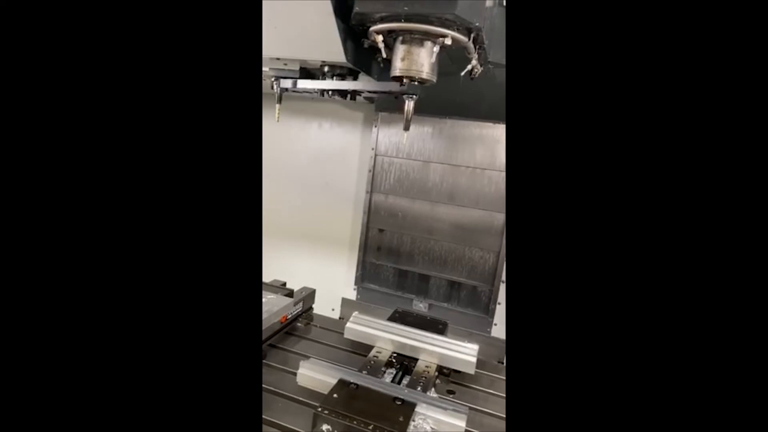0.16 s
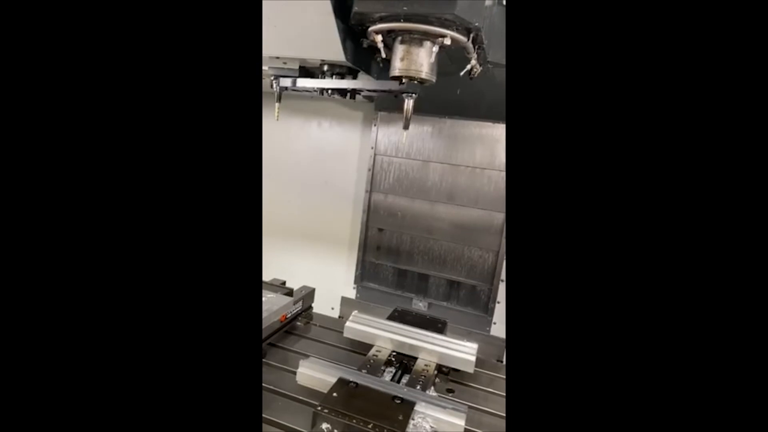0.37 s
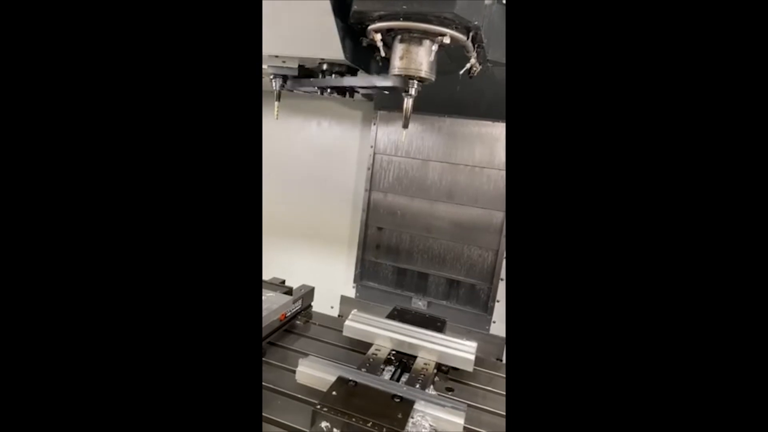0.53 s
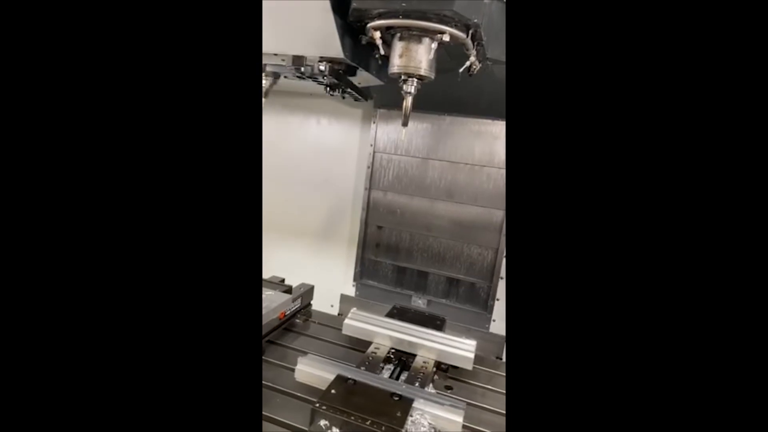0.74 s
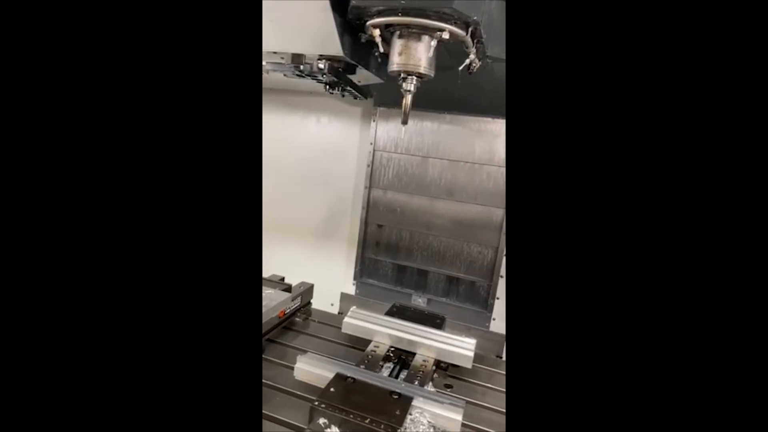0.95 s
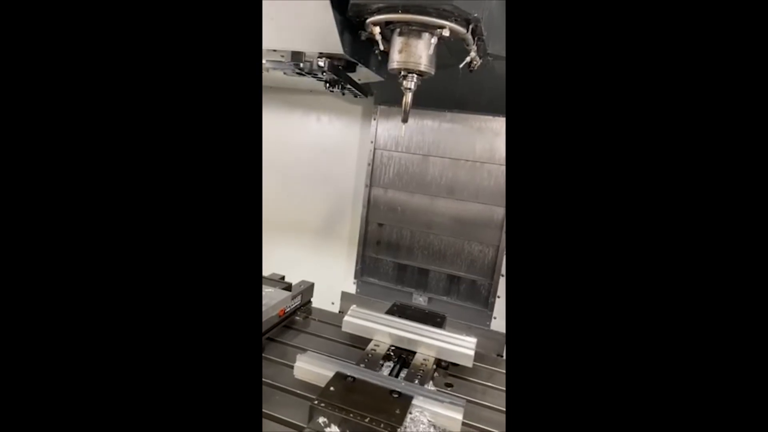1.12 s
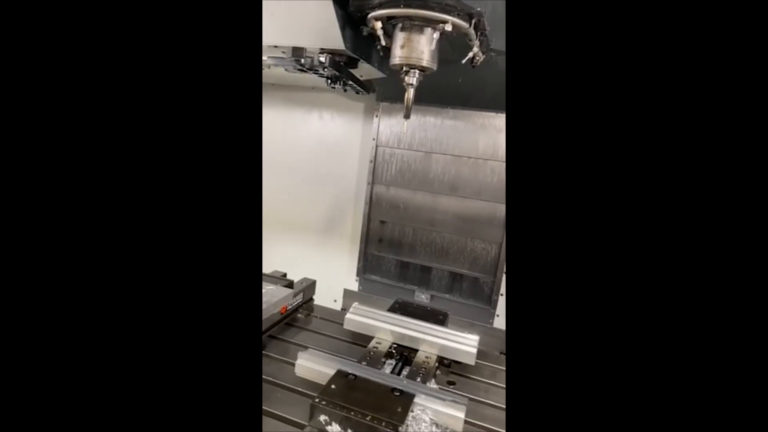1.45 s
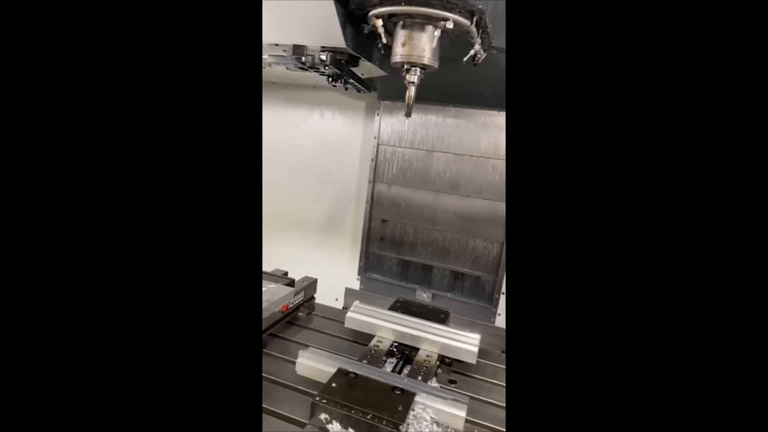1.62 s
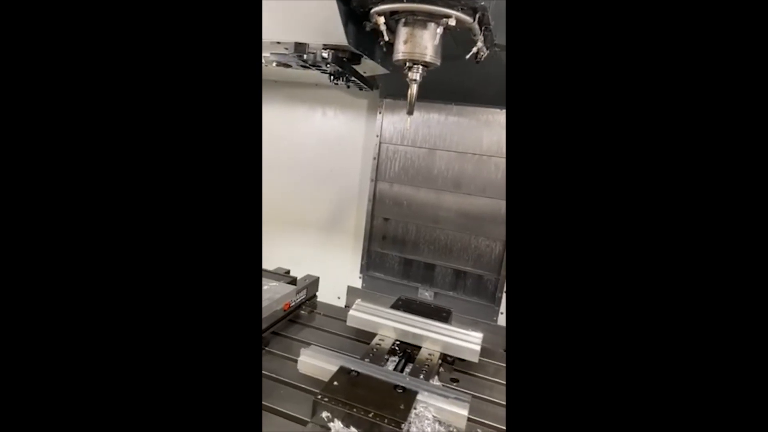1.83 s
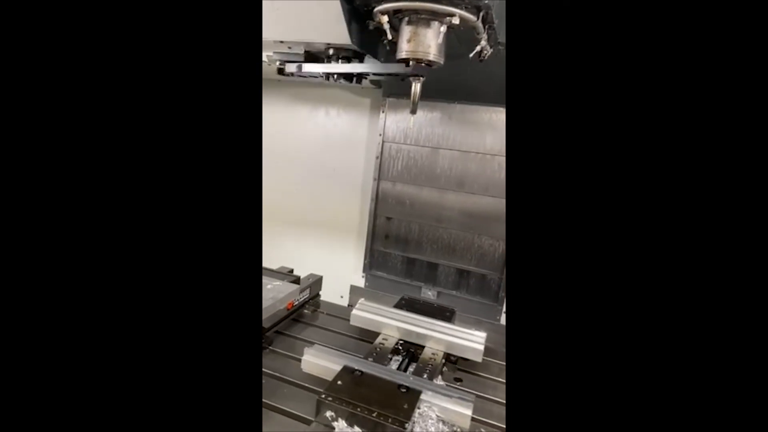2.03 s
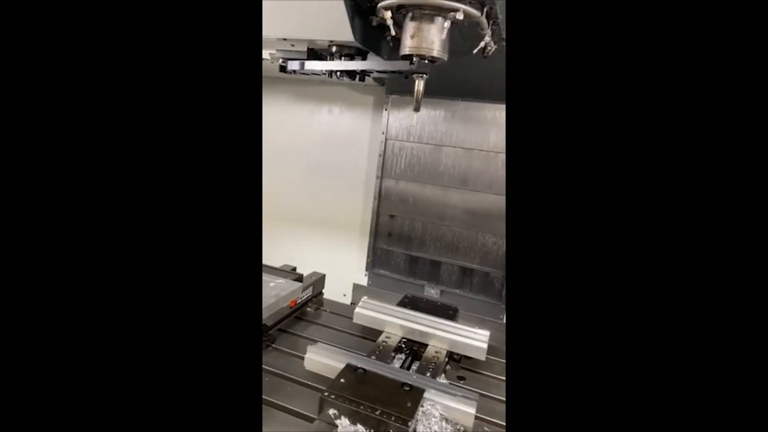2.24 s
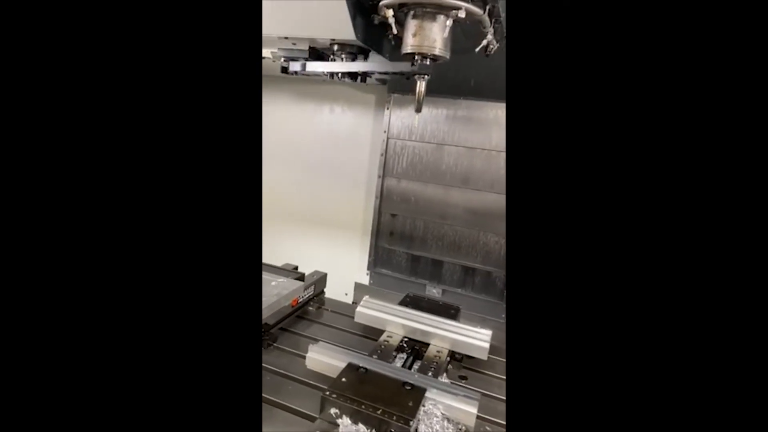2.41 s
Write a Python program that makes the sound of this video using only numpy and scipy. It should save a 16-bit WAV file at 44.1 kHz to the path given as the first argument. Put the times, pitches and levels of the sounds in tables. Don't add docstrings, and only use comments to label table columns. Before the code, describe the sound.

Inside a machining centre, a geared motor winds down, latches snap and ring, the frame thumps and compressed air puffs; a second latch hits before the motor whirs up again. Short metallic echo, constant pump hum, phone at the open door.

```python
import sys
import numpy as np
from scipy import signal
from scipy.fft import rfft, irfft, next_fast_len
from scipy.io import wavfile
from scipy.ndimage import uniform_filter1d

SR = 44100
rng = np.random.default_rng(int(sys.argv[2]) if len(sys.argv) > 2 else 0)


def magnitude_from_level(level_db):
    exponent = np.asarray(level_db, float) / 20
    return 10 ** exponent


def waveform_to_disk(signal):
    frames = np.transpose(np.atleast_2d(signal))
    scaled = np.clip(frames, -1, 1) * 32767
    samples = np.round(scaled).astype(np.int16)
    wavfile.write(sys.argv[1], SR, samples)


N = 113337

# (time [s], gear teeth meeting per second [Hz], level [dB])
SERVO_DOWN = [
    (0, 1045, -18.5),
    (0.038, 774.5, -37.5),
    (0.082, 558, -30.5),
    (0.118, 378, -66),
    (.16, 300, -69),
]
# (time [s], gear teeth meeting per second [Hz], level [dB])
SERVO_UP = [
    (2.319, 333, -70),
    (2.383, 536, -41),
    (2.421, 732.6, -37.5),
    (2.452, 869, -25),
    (2.469, 946.6, -26.5),
    (2.487, 992, -20),
    (2.511, 1023, -21),
    (2.531, 1055, -21.5),
    (2.57, 1013, -24.5),
]
# (frequency [Hz], width [Hz], level [dB])
HOUSING = [(527, 59, -9.5), (690, 140, -0.5), (849, 100, 5), (1000, 66, 8.5), (1230, 210, 5.5),
           (1712, 37, -0.5), (2190, 170, 1.5), (2750, 170, 9), (3570, 300, -8), (3300, 100, -1),
           (4170, 30, -4), (4820, 90, -2.5), (5300, 180, -11.5), (8900, 620, -25)]
# (time [s], level [dB], 60 dB decay [s], centre [Hz], width [octaves])
CLACKS = [(.016, -20, .42, 2780, 1.34), (.1955, -16, .035, 2950, .25), (.2, -28, .19, 1450, 1.1),
          (.5134, -8, .018, 4600, 1.6), (.5178, -11, .025, 3500, 1.3), (.528, -13, .02, 4500, 1),
          (.536, -21, .03, 3400, .5), (1.9817, -10, .025, 7000, .5), (.72, -30, .04, 5500, .3),
          (.519, -21.5, .25, 4000, .72), (.6958, -18, .045, 5750, .12), (.697, -29, .6, 2200, 1.8),
          (.946, -32, .12, 1500, 1.1), (.978, -26, .35, 1300, 1), (1.229, -24.5, .31, 330, .8),
          (2.423, -24, .13, 5200, 1), (0, -27, .78, 291, 1.1), (.535, -24.5, .28, 500, 1.1),
          (1.49, -29.5, .22, 172, .89), (1.98, -28, .6, 690, 1.3), (1.981, -23, .34, 380, .35),
          (2.09, -24, .45, 278, 1.2), (1.835, -26, .19, 1200, 1.8), (1.9783, -12, .03, 6500, 1.2),
          (1.983, -20, .2, 8000, .8), (1.982, -24, .3, 3500, .9), (2.087, -26, .085, 3800, .8),
          (2.095, -27, .3, 1600, 1), (2.265, -35.5, .3, 2780, .22)]
# (time struck [s], frequency [Hz], level [dB], 60 dB decay [s])
RINGS = [(.009, 4645, -31, .2), (.041, 2165, -28, .2), (.021, 4275, -25, .35), (.057, 4262, -27, .25),
         (.013, 3185, -32, .4), (.204, 850, -30, .3), (.5155, 2110, -19, .08), (.53, 2930, -35, .4),
         (.5143, 3350, -19, .09), (.5035, 4470, -31, .3), (.5145, 4470, -20, .2), (.5182, 3645, -23, .11),
         (.5142, 4650, -23, .35), (.525, 5160, -27, .2), (.5141, 5645, -30, .2), (.5139, 6210, -29, .2),
         (.527, 4720, -26, .12), (.5135, 4570, -23, .45), (.55, 465, -23, .24), (1.028, 3090, -39, .45),
         (.986, 710, -33, .28), (1.216, 770, -35, .35), (1.226, 312, -26, .3), (1.985, 695, -31, .25),
         (1.9795, 2010, -19, .05), (1.981, 2875, -31, .45), (1.9805, 3385, -28, .22),
         (1.9802, 4135, -31, .18), (1.9803, 5255, -28, .11), (1.9801, 6250, -25, .25),
         (2.02, 1140, -32, .25), (2.101, 1015, -29, .2), (2.091, 740, -31, .19), (.411, 755, -42, .3),
         (1.979, 9400, -25, .3),
    (1.979, 10100, -29, .3),
    (.514, 7900, -25, .12),
    (.518, 11800, -34, .15),
    (.002, 4270, -27, .4),
]
# (time [s], frequency [Hz], level [dB], 60 dB decay [s])
THUDS = [(0, 45.2, -17.5, 0.72), (.01, 139.4, -28.5, 1.46), (0.202, 73, -23.5, 0.24), (.52, 64, -47, 0.17),
         (0.702, 45.4, -24.5, 0.41), (1.005, 51.2, -26, 1.5), (1.006, 120.8, -16, 0.61),
         (1.23, 118.8, -15, 0.37), (1.273, 158.4, -21, 0.66), (1.33, 128.4, -24.5, 0.72),
         (1.598, 67.9, -29.5, 2.1), (2.087, 87, -13, 0.27), (2.11, 52.6, -20, 0.64),
         (2.153, 139.2, -22, 0.51), (2.463, 49.1, -20.5, 1)]
# (start [s], length [s], level [dB], attack [s], 60 dB release [s])
BLOWS = [
    (0, 0.21, -30, .003, 0.49),
    (0.67, 0.32, -32.5, 0.004, 0.28),
    (1.471, 0.34, -25, 0.039, 0.68),
    (2.03, 0.04, -69.5, 0.022, 0.27),
    (2.142, 0.27, -39, 0.012, 0.3),
    (2.397, 0.23, -37.5, 0.0046, .3),
]
# (frequency [Hz], level [dB])
AIR_COLOUR = [(300, -22), (900, -12), (1600, -4), (4000, -4), (6500, -2), (9500, -2), (12200, -8),
              (15600, -12)]
# (frequency [Hz], width [Hz], level [dB])
NOZZLE = [(2660, 130, -21), (5200, 250, -19), (6500, 150, -19), (9500, 600, -14)]
# (frequency [Hz], level [dB])
HUM_COLOUR = [(28, -2), (48, -3), (120, -3.5), (450, -12), (620, -14), (1700, -18), (3500, -25.5),
              (15000, -38.5)]
# (frequency [Hz], level [dB])
PUMP_TONES = [(68, -36), (251, -40), (501, -38.5), (1693, -44.5)]
# (frequency [Hz], side over mid [dB], likeness [0-1], side leads mid [radians])
PORTS = [(50, -33, .95, 3.1), (200, -12, .9, 3.1), (400, -8, .7, 2.9), (720, 4, .45, 2.6),
         (1050, 1, .68, 2.9), (2500, 1.5, .4, 1.7), (5500, 2.5, .7, 1.6), (7000, 5, .9, 1.6),
         (8300, 19, .9, 1.6), (11500, 17, .9, 1.6), (13200, 4, .6, 1.6), (15000, -3, .6, 1.5),
         (15500, -45, .8, 1.5)]
# (lowest frequency [Hz], share of time [0-1])
TREBLE_OPEN = [(6900, .85), (7300, .6), (7700, .15), (8200, 0), (11000, .05), (11800, .25), (12600, .5),
               (13000, .7), (13400, .85), (13800, .9), (14200, .95), (14600, .9), (15000, .8), (15400, .65),
               (15800, 0)]
# (start [s], end [s], lowest [Hz], highest [Hz])
TREBLE_SHUT = [
    (.56, .65, 12600, 14200),
    (1.04, 1.11, 11000, 13800),
    (2.22, 2.39, 14200, 16000),
    (2.47, 2.57, 6900, 14200),
    (2.2, 2.4, 7600, 8200),
]

GEAR_WOBBLE_DB, GEAR_JITTER, TEETH_SHARE = 2.2, .011, 1.2
GRIND_DB, WIDE_GRIND_DB, GRIND_WOBBLE_DB, OVERTONE_DB = -4, -6, 1.4, -10.5
RATTLE_DB, RING_GRAIN_DB, RING_JITTER = 2.2, 3, .005
PUSH_CYCLES = 0.7
HUM_DB, HUM_FLICKER_DB = -30, 1.1
ROOM_T60_S, ROOM_DB, SERVO_ROOM_DB, SCATTER_S = 0.17, -1, -7, 0.02
OPEN_HOLD_S, SHARP_S = .046, [.503, 1.964, 2.402]


def freqs(size):
    return np.maximum(np.arange(size // 2 + 1) * SR / size, 1)


def logread(f, table, column=1):
    table = np.array(table)
    return np.interp(np.log(f), np.log(table[:, 0]), table[:, column])


def unit(x):
    return x / np.sqrt(np.mean(x ** 2))


def shaped(x, gain):
    size = next_fast_len(len(x))
    return irfft(rfft(x, size) * gain(freqs(size)), size)[:len(x)]


def band(x, hz, width_hz):
    return signal.lfilter(*signal.iirpeak(hz, hz / width_hz, fs=SR), x)


def walk(rate_hz, size=N):
    k = int(SR / rate_hz)
    smooth = uniform_filter1d(rng.standard_normal(size), k)
    return unit(uniform_filter1d(smooth, k))


def turning(hz):
    return 2 * np.pi * np.cumsum(hz) / SR


def fall(t, t60):
    return np.exp(-np.log(1000) * np.maximum(t, 0) / t60)


def add(out, start_s, x):
    i = max(int(start_s * SR), 0)
    out[i:i + len(x)] += x[:N - i]


def gears(t, curve):
    s, hz, db = np.array(curve).T
    phase = turning(np.interp(t, s, hz) * (1 + GEAR_JITTER * walk(150)))
    teeth = np.cos(phase) + magnitude_from_level(OVERTONE_DB) * np.cos(2 * phase)
    teeth = teeth * magnitude_from_level(GEAR_WOBBLE_DB * walk(220))
    load = magnitude_from_level(np.interp(t, s, db, -120, -120))
    grit = rng.standard_normal(N) * magnitude_from_level(GRIND_WOBBLE_DB * walk(60))
    rung = np.zeros(N)
    for k, (centre, width, level) in enumerate(HOUSING):
        push = load * (teeth + magnitude_from_level(GRIND_DB) * grit * np.sqrt(SR / 20 / width))
        rung += (-1) ** k * magnitude_from_level(level) * band(push, centre, width)
    return load * (TEETH_SHARE * teeth + magnitude_from_level(WIDE_GRIND_DB) * band(grit, 2300, 5000)) + rung


def clacks():
    out, t = np.zeros(N), np.arange(SR // 2) / SR
    for s, db, t60, hz, octaves in CLACKS:
        noise = rng.standard_normal(len(t))
        noise = unit(shaped(noise, lambda f: np.exp(-(np.log2(f / hz) / octaves) ** 2 / 2)))
        rattle = magnitude_from_level(db + RATTLE_DB * walk(280, len(t)))
        add(out, s, rattle * noise * np.clip(t * hz / 2, 0, 1) * fall(t, t60))
    return out


def rings():
    out, t = np.zeros(N), np.arange(SR // 2) / SR
    for s, hz, db, t60 in RINGS:
        grain = magnitude_from_level(RING_GRAIN_DB * walk(130, len(t)))
        phase = turning(hz + (RING_JITTER * hz + 12) * walk(200, len(t)))
        onset = np.clip(t / 0.0021, 0, 1)
        add(out, s, magnitude_from_level(db) * grain * np.sin(phase) * onset * fall(t, t60))
    return out


def thuds():
    out, t = np.zeros(N), np.arange(SR) / SR
    for s, hz, db, t60 in THUDS:
        phase = turning(hz * (1 + 0.079 * walk(34, SR)))
        level = magnitude_from_level(db + 1.8 * walk(25, SR))
        push = np.clip(t * hz / PUSH_CYCLES, 0, 1)
        add(out, s, level * np.sin(phase) * push * fall(t, t60))
    return out


def air(t):
    flow = np.zeros(N)
    for s, length, db, attack, release in BLOWS:
        flow += magnitude_from_level(db) * np.clip((t - s) / attack, 0, 1) * fall(t - s - length, release)
    jet = unit(shaped(rng.standard_normal(N), lambda f: magnitude_from_level(logread(f, AIR_COLOUR))))
    whistle = np.zeros(N)
    for hz, width, db in NOZZLE:
        whistle += magnitude_from_level(db + 2.8 * walk(16)) * unit(band(rng.standard_normal(N), hz, width))
    return flow * magnitude_from_level(.6 * walk(60)) * (jet + whistle)


def hum(t):
    noise, out = rng.standard_normal(N), np.zeros(N)
    for hz in 24 * 2 ** np.arange(0, 9.6, .5):
        def gain(f):
            bell = np.cos(np.pi * np.clip(np.log2(f / hz), -.5, .5)) ** 2
            return magnitude_from_level(logread(f, HUM_COLOUR)) * bell
        out += shaped(noise, gain) * magnitude_from_level(HUM_FLICKER_DB * walk(14))
    out = magnitude_from_level(HUM_DB) * unit(out)
    for hz, db in PUMP_TONES:
        level = magnitude_from_level(db + 2.1 * walk(7.3))
        out += level * np.sin(turning(hz * (1 + 0.00391 * walk(8.4))))
    return out


def echo(x, t60):
    t = np.arange(int(t60 * SR)) / SR
    tail = rng.standard_normal(len(t)) * fall(t, t60)
    return signal.fftconvolve(x, tail / np.sqrt(np.sum(tail ** 2)))[:N]


def patchy(spectrum, f, t):
    edges = [hz for hz, _ in TREBLE_OPEN] + [SR]
    out = irfft(spectrum * (f < edges[0]))[:N]
    sharp = sum(np.abs(t - s - OPEN_HOLD_S / 4) < OPEN_HOLD_S / 5 for s in SHARP_S)
    hold = int(OPEN_HOLD_S * SR)
    for (lo, share), hi in zip(TREBLE_OPEN, edges[1:]):
        shut = sum((t > a) * (t < b) * (low <= lo < high) for a, b, low, high in TREBLE_SHUT)
        is_open = np.repeat(rng.random(N // hold + 1) < share, hold)[:N]
        gate = np.maximum(is_open * (1 - shut), sharp) * 1.
        part = irfft(spectrum * (f >= lo) * (f < hi))[:N]
        out = out + uniform_filter1d(gate, size=600) * part
    return out


def scene():
    t = np.arange(N) / SR
    servo = gears(t, SERVO_DOWN) + gears(t, SERVO_UP)
    blows = clacks() + rings()
    low = thuds()
    events = servo + blows
    far = magnitude_from_level(SERVO_ROOM_DB) * servo + blows
    near = events + low + magnitude_from_level(ROOM_DB) * echo(far, ROOM_T60_S) + air(t) + hum(t)
    other = echo(events + low, SCATTER_S) + magnitude_from_level(ROOM_DB) * echo(events, ROOM_T60_S) + air(t) + hum(t)
    size = 2 ** 17
    f = freqs(size)
    angle = np.arctan(magnitude_from_level(logread(f, PORTS)))
    like = np.clip(logread(f, PORTS, column=2), 0, 1)
    lead = np.exp(1j * logread(f, PORTS, column=3))
    a, b = rfft(near, size), rfft(other, size)
    mid = patchy(a * np.cos(angle), f, t)
    side = irfft(np.sin(angle) * (like * a * lead + np.sqrt(1 - like ** 2) * b))[:N]
    return np.array([mid + side, mid - side])


def roll_off(x):
    return signal.sosfilt(signal.butter(12, 16510, fs=SR, output="sos"), x)


def record(dry):
    top_cut = signal.ellip(8, .2, 70, 16400, fs=SR, output="sos")
    bass_cut = signal.butter(5, 36, "high", fs=SR, output="sos")
    mix = signal.sosfilt(bass_cut, signal.sosfilt(top_cut, dry))
    return roll_off(mix)


dry = scene()
out = record(dry)
waveform_to_disk(out)
```